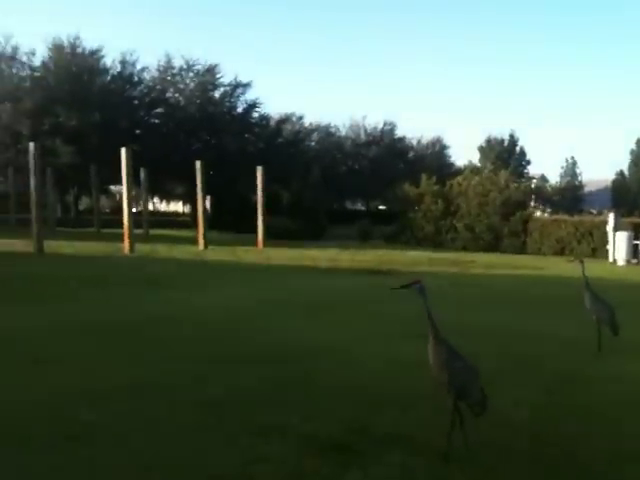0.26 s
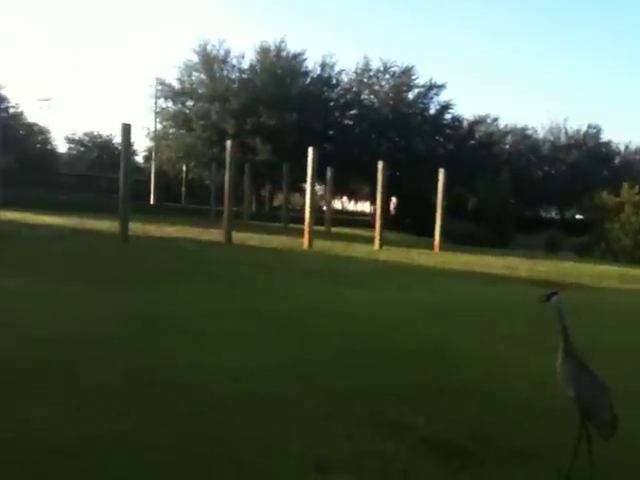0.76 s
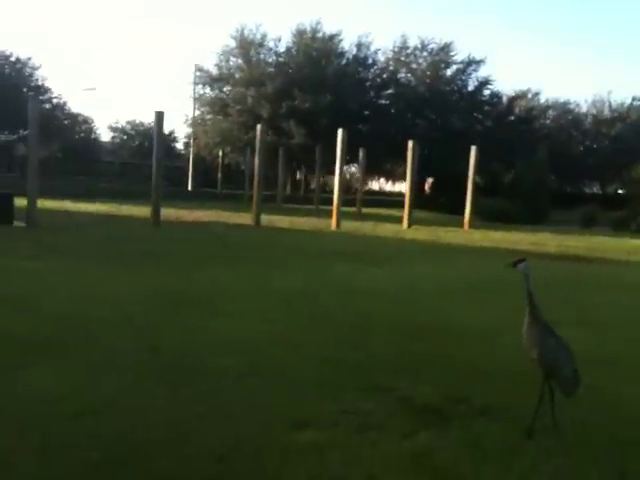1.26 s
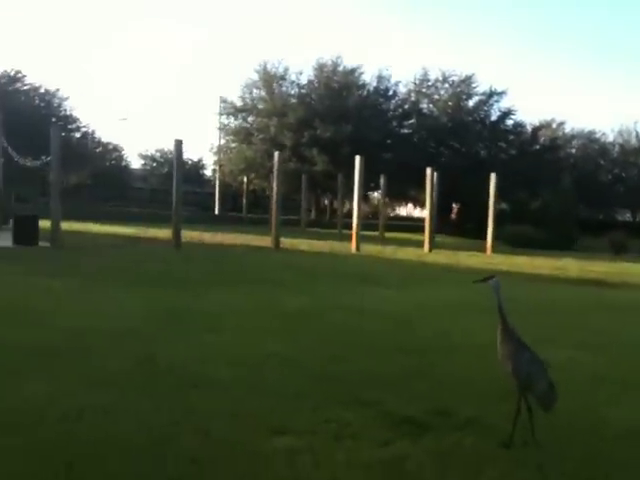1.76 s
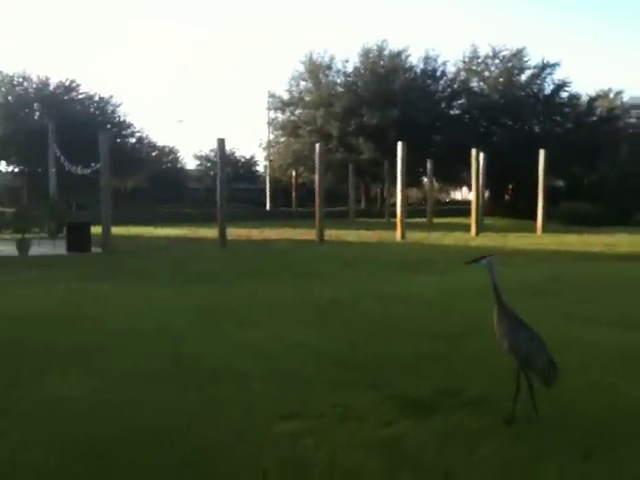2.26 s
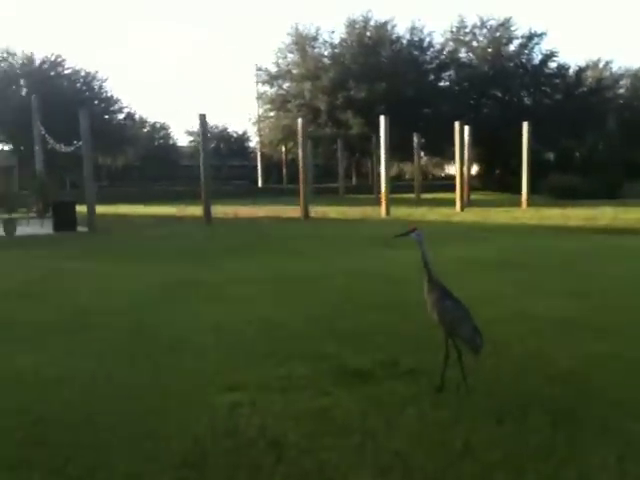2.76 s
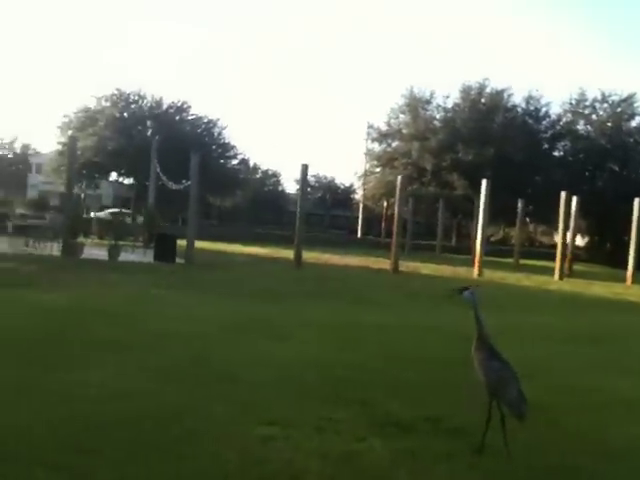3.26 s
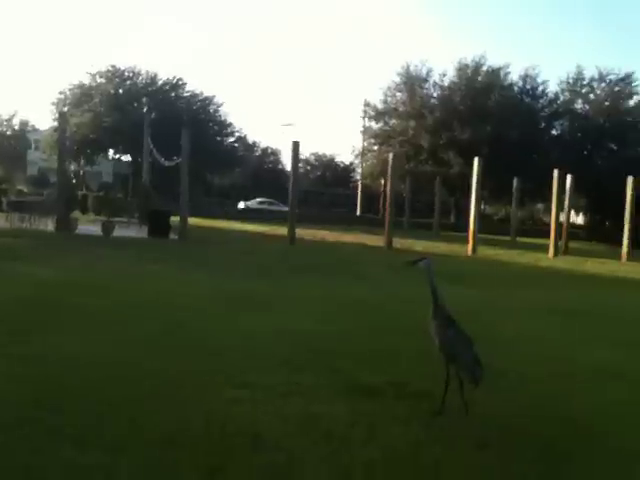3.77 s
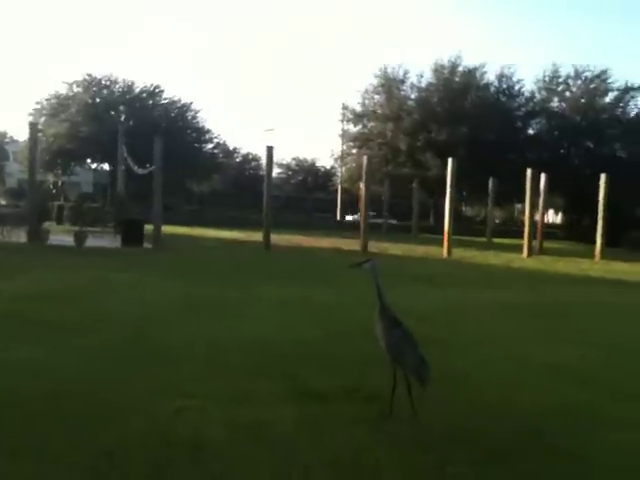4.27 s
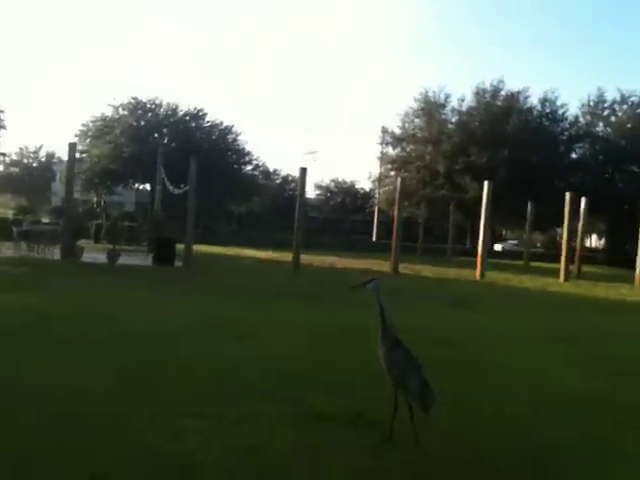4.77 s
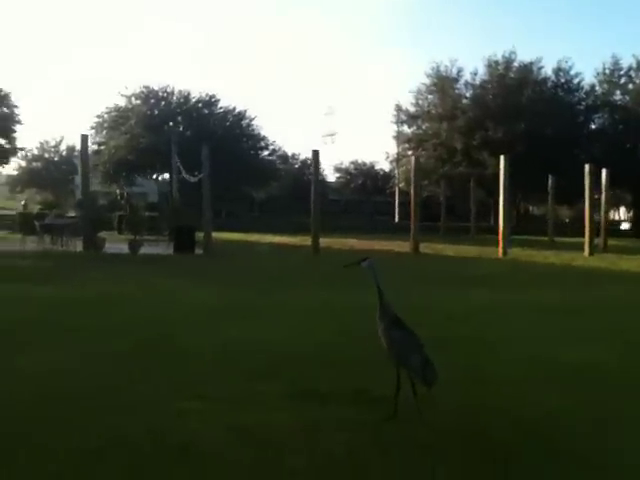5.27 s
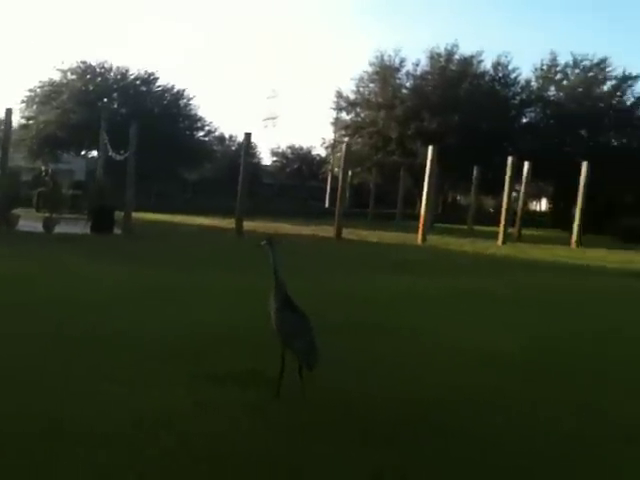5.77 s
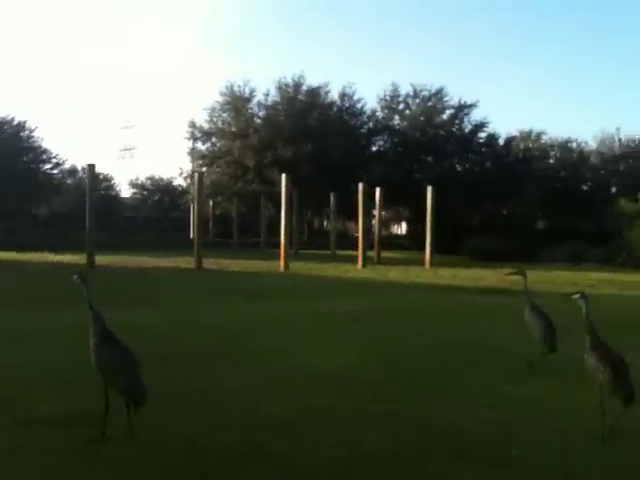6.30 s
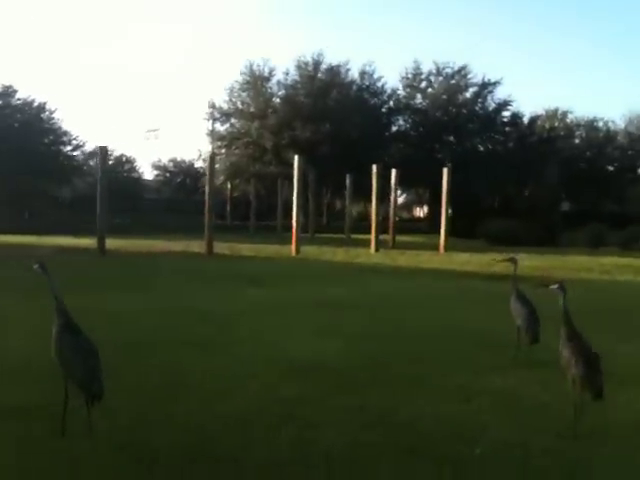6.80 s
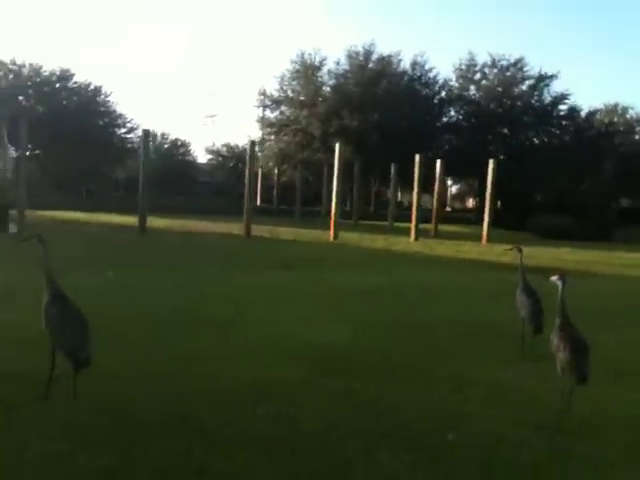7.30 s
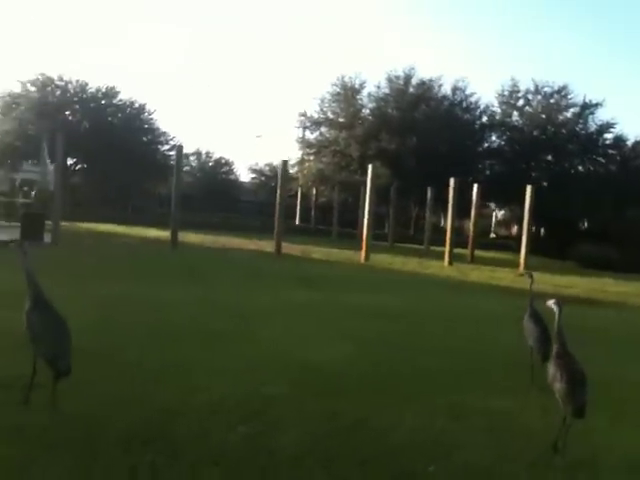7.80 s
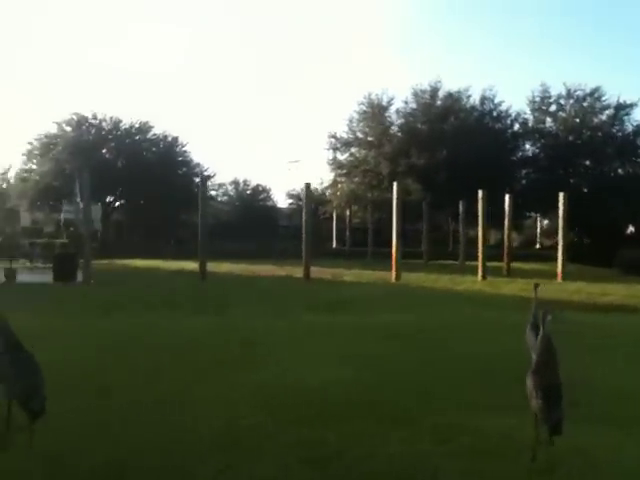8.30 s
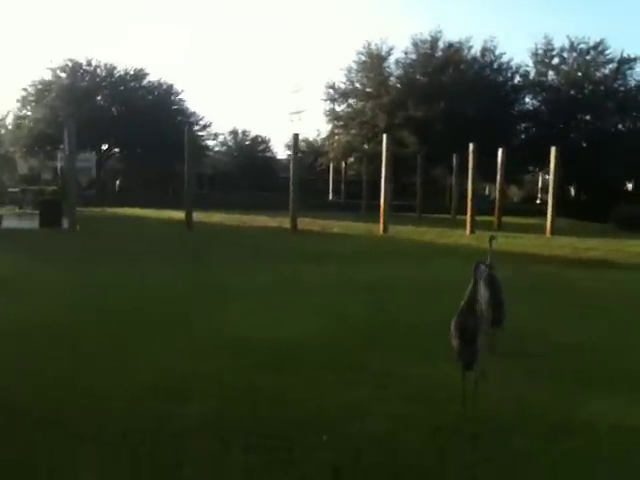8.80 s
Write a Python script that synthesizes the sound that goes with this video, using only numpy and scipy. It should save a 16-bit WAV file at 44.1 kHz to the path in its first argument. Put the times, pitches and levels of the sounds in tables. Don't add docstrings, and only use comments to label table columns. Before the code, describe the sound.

Outdoors on a residential lawn, two cranes call almost together, four times. The lower, stronger bird starts with a tiny rising hoot and a hard woody rattle; the higher, weaker bird joins a fifth of a second later. Each burst lasts about half a second, with faint echoes from houses and trees. Low town hum, far tyres and light hiss continue between calls, picked up by a phone microphone.

```python
import sys
import numpy as np
from scipy import signal
from scipy.fft import rfft, irfft
from scipy.io import wavfile
from scipy.ndimage import uniform_filter1d

SR = 44100
rng = np.random.default_rng(int(sys.argv[2]) if len(sys.argv) > 2 else 0)


def wav_record(signal):
    frames = np.transpose(np.atleast_2d(signal))
    bounded = np.clip(frames, -1, 1)
    quanta = np.round(bounded * 32767).astype(np.int16)
    wavfile.write(sys.argv[1], SR, quanta)


def undo_db(level):
    steps = np.asarray(level, float) / 20
    return 10 ** steps


N = 399105


def colour(points, hz):
    f, db = np.transpose(points)
    return np.interp(np.log(np.maximum(hz, 1)), np.log(f), db)


def band(x, lo_hz, hi_hz):
    sos = signal.butter(2, [lo_hz, min(hi_hz, .49 * SR)], "bandpass", fs=SR, output="sos")
    return signal.sosfilt(sos, x)


def unit(x):
    return x / np.sqrt(np.mean(x ** 2))


def bell(t, at, width):
    return np.exp(-.5 * ((t - at) / width) ** 2)


def noise_band(n, lo_hz, hi_hz):
    return unit(band(rng.standard_normal(n), lo_hz, hi_hz))


def walk(rate_hz):
    k = int(SR / rate_hz)
    held = np.repeat(rng.standard_normal(N // k + 1), k)
    return uniform_filter1d(uniform_filter1d(held, k), k)[:N]


def add(out, sound, start_s):
    i = int(start_s * SR)
    out[i:i + len(sound)] += sound[:N - i]


LOW_FACING = [3, 3, 0, 0.5]
LOW_NECK = [.99, 1.01, 1.01, 0.91]
LOW_DROP = [0.925, .92, .94, 0.95]
LOW_COUNT = [7, 7, 6, 6]
# round trip in ms, third pitch in Hz, last pitch in Hz, treble loss as a burst weakens,
# breath in dB, run-up in dB.
LOW_PIPE = (5, 806, 611, 0, -20, -25.5)
# frequency in Hz, level in dB.
LOW_BEAK = [(500, 8.5), (900, 2.5), (1300, 0), (1800, -17), (2700, -24.5), (3700, -19), (4700, -18.5),
            (6500, -26), (10000, -37), (16000, -41)]
# frequency in Hz, width in Hz, level in dB.
LOW_MODES = [(589.3, 32, 0), (861, 25, -5), (1746, 88, -1.5), (3260, 250, -0.5)]
# start in seconds, level in dB.
LOW_HOOTS = [
    (0.4992, -25.5),
    (3.138, -26),
    (5.475, -25.5),
    (7.444, -26),
]
# time from its start in ms, pitch in Hz, level in dB.
LOW_HOOT = [(-12, 570, -29), (-6.5, 480, -9), (3, 520, -2), (16.5, 552, 0), (34, 572, 0.5), (45, 570, -0.5),
            (51.5, 516, -9), (59.5, 400, -27)]
LOW_HOOT_TONES = [-1, -2, -14.5, -18.5, -21, -24, -22.5, -27.5, -25.5, -31, -28, -36]
# first clap in seconds, first gap in ms, settled gap in ms, closing gap in ms.
LOW_PACE = [(.6232, 67.2, 51.8, 54), (3.2614, 68.3, 50.7, 65), (5.6022, 69.0, 52.3, 62),
            (7.5672, 69.0, 51, 62)]
# level in dB, fade by its end in dB, opening pitch in Hz, final pitch in Hz,
# closing clap in dB.
LOW_EFFORT = [(-5.5, 6.5, 932, 818, -33), (-7, 11, 944, 850, -39), (-10.5, 8, 946, 810, -35.5),
              (-11.5, 6.5, 949, 807, -35)]
# share of the extra gap kept per clap, bend of the fade, bend of the pitch sag,
# first clap in dB, closing pitch in Hz.
LOW_STYLE = (0.7016, 3, 2, -0.1, 579)
LOW_TIRING = [(1.0, 1.24), (-4.5, -2.5), (-15.5, -5.5)]


def low_crane():
    calls = rattles(LOW_PACE, LOW_EFFORT, LOW_DROP, LOW_COUNT, LOW_STYLE, LOW_TIRING)
    return crane(calls, LOW_FACING, LOW_NECK, LOW_PIPE, LOW_BEAK, LOW_MODES,
                 LOW_HOOTS, LOW_HOOT, LOW_HOOT_TONES)


HIGH_FACING = [4, 4, 1, -2.5]
HIGH_NECK = [1.08, 0.82, 1.01, .8]
HIGH_DROP = [0.876, 0.905, 0.906, 0.95]
HIGH_COUNT = [9, 9, 8, 9]
# round trip in ms, third pitch in Hz, last pitch in Hz, treble loss as a burst weakens,
# breath in dB, run-up in dB.
HIGH_PIPE = (5.5, 902, 865, 0.13, -16, -49)
# frequency in Hz, level in dB.
HIGH_BEAK = [(500, 12.5), (1000, 2), (1400, -6.5), (1900, -6.5), (2300, -19), (3100, -14.5), (4300, -16.5),
             (6500, -24.5), (10000, -46), (16000, -56)]
# frequency in Hz, width in Hz, level in dB.
HIGH_MODES = [(679, 34, -2.5), (876, 33, -6.5), (1086, 148, -6), (1806, 71, -1.5), (1936, 47, 2)]
# start in seconds, level in dB.
HIGH_HOOTS = [
    (.72, -39),
    (3.392, -38.5),
    (5.948, -36.5),
    (7.83, -32),
]
# time from its start in ms, pitch in Hz, level in dB.
HIGH_HOOT = [(-10, 560, -28), (1, 530, -3), (10, 620, 2.5), (32.5, 623, -0.5), (31, 740, -13),
             (43, 770, -25.5)]
HIGH_HOOT_TONES = [0, 1, -3.5, -34, -9, -19, -18, -24, -27.5, -34, -38, -37]
# first clap in seconds, first gap in ms, settled gap in ms, closing gap in ms.
HIGH_PACE = [(.8298, 72.36, 52.4, 51.5), (3.5025, 72.23, 53.46, 54.6), (6.0612, 72.2, 52.52, 55),
             (7.9364, 70.2, 52.86, 55.2)]
# level in dB, fade by its end in dB, opening pitch in Hz, final pitch in Hz,
# closing clap in dB.
HIGH_EFFORT = [(-16.5, 4.1, 1110, 906, -38), (-14, 7.4, 1096, 906, -37.5), (-14.5, 7.4, 1043, 940, -38.5),
               (-11, 14.7, 1063, 900, -53)]
# share of the extra gap kept per clap, bend of the fade, bend of the pitch sag,
# first clap in dB, closing pitch in Hz.
HIGH_STYLE = (0.6845, 5, 3.5, -3.5, 627)
HIGH_TIRING = [(1.0, 1.09), (-3, -3.5), (-15.5, -6)]


def high_crane():
    calls = rattles(HIGH_PACE, HIGH_EFFORT, HIGH_DROP, HIGH_COUNT, HIGH_STYLE, HIGH_TIRING)
    return crane(calls, HIGH_FACING, HIGH_NECK, HIGH_PIPE, HIGH_BEAK, HIGH_MODES,
                 HIGH_HOOTS, HIGH_HOOT, HIGH_HOOT_TONES)


def crane(calls, facing, neck, pipe, beak, modes, hoots, shape, tones_db):
    out = np.zeros(N)
    octave = np.log2(np.arange(len(tones_db)) + 4.0)
    for rows, facing_db, stretch, (start_s, db) in zip(calls, facing, neck, hoots):
        opening = hoot(shape, tones_db + facing_db * 1.24 * octave)
        add(out, undo_db(db) * opening, start_s + shape[0][0] / 1000)
        for row in rows:
            add(out, clap(row, facing_db, stretch, pipe, beak), row[0] - 500 / SR)
    ring = 0
    for hz, width_hz, db in modes:
        ring = ring + undo_db(db) * signal.lfilter(*signal.iirpeak(hz, hz / width_hz, fs=SR), out)
    return undo_db(-3.5) * (out + ring)


def rattles(paces, efforts, drops, counts, style, tiring):
    return [rattle(p, e, d, style, tiring, n) for p, e, d, n in zip(paces, efforts, drops, counts)]


def rattle(pace, effort, drop, style, tiring, count):
    scatter_db, scatter_pitch = 1.5, .006
    start_s, first_ms, settled_ms, closing_ms = pace
    level_db, fade_db, open_hz, final_hz, closing_db = effort
    keep, fade_bend, sag_bend, first_db, closing_hz = style
    k = np.arange(count)
    gaps_ms = np.append(settled_ms + (first_ms - settled_ms) * keep ** k[:-1], closing_ms)
    s = start_s + np.append(0, np.cumsum(gaps_ms)) / 1000
    tired = k / k[-1]
    luck = rng.standard_normal((4, count))
    db = level_db - fade_db * tired ** fade_bend + first_db * (k == 0) + scatter_db / 2 * luck[0]
    hz = (open_hz + (final_hz - open_hz) * tired ** sag_bend) * (1 + scatter_pitch * luck[1])
    share, second_db, dying_db = (fresh + (worn - fresh) * tired ** 2 for fresh, worn in tiring)
    second_db = second_db + scatter_db * luck[2]
    dying_db = dying_db + scatter_db * luck[3]
    rows = np.transpose([s[:-1], db, hz, drop * share * hz, second_db, dying_db])
    return list(rows) + [(s[-1], closing_db, closing_hz, 0.91 * closing_hz, -3.0, -17.0)]


def clap(row, facing_db, stretch, pipe, beak):
    _, peak_db, first_hz, second_hz, second_db, dying_db = row
    trip_ms, third_hz, last_hz, loss, breath_db, runup_db = pipe
    crack_db = -27.5
    t = np.arange(-500, 1700) / SR
    luck = rng.standard_normal((3, 5))
    echo_ms = trip_ms * stretch * np.array([-1.2, 0, 1, 2, 3])
    centre_s = (echo_ms + .3 * luck[0] * [1, 0, 1, 1, 1]) / 1000
    last_db = dying_db - 5.0 - 1.34 * facing_db
    size_db = np.array([runup_db, 0, second_db - 2.0, dying_db + 1.5, last_db])
    size_db = size_db + 1.45 * luck[1] * [1, 0, 0, 1, 1]
    pitch_hz = np.array([first_hz, first_hz, second_hz, min(third_hz, second_hz), min(last_hz, second_hz)])
    pitch_hz = pitch_hz * (1 + 0.019 * luck[2] * [1, 0, 0, 1, 1])
    rise_ms, fall_ms = [1.5, 1.6, 1.5, 1.5, 1.5], [1.5, 2.1, 2.1, 1.8, 3.9]
    ragged = [.2, .25, .6, 1.1, 1.2]
    k = np.arange(1, 22)[:, None]
    voice, effort = 0, 0
    for at, db, hz, rise, fall, rag in zip(centre_s, size_db, pitch_hz, rise_ms, fall_ms, ragged):
        size = undo_db(db) * bell(1000 * (t - at), 0, np.where(t < at, rise, fall))
        wobble = uniform_filter1d(rng.standard_normal(len(t)), size=40)
        phase = 2 * np.pi * np.cumsum(hz * (1 - 3.5 * (t - at) + .16 * rag * wobble)) / SR
        phase = phase - np.interp(at, t, phase) + .4 * rag * rng.standard_normal()
        high = np.clip(np.log2(k * hz / 1200), 0, 2.9)
        lead = t - at + 0.29 * high / 1000
        front = undo_db(db) * bell(1000 * lead, 0, np.where(lead < 0, rise, fall))
        chance = rag * rng.standard_normal((2, len(k), 1)) * (k > 1)
        treble_db = (facing_db - 2.0 * rag) * high ** 1.436
        tones = undo_db(colour(beak, k * hz) + treble_db + 4.3 * chance[0]) * (k * hz < .4 * SR)
        waves = np.cos(k * phase + 0.4 * (k - 1) + chance[1])
        voice = voice - np.sum(tones * front ** (1 + loss * high) * waves, axis=0)
        effort = effort + size * (at >= 0)
    breath = noise_band(len(t), 686, 3230) * effort ** 0.58 * undo_db(breath_db + facing_db)
    early = np.roll(effort, shift=-25)
    crack = noise_band(len(t), 2000, 10500) * early ** 3.05 * undo_db(crack_db + 3.4 * facing_db)
    return undo_db(peak_db) * (voice + breath + crack)


def hoot(rows, tones_db):
    ms, hz, db = np.transpose(rows)
    t_ms = np.arange(ms[0], ms[-1], 1000 / SR)
    n = len(t_ms)
    wobble = uniform_filter1d(rng.standard_normal(n), size=150)
    glide_hz = uniform_filter1d(np.interp(t_ms, ms, hz), size=200)
    phase = 2 * np.pi * np.cumsum(glide_hz * (1 + .13 * wobble)) / SR
    tones_db = np.append(tones_db, tones_db[-1] - 1.55 * np.arange(1, 13))
    size = undo_db(np.interp(t_ms, ms, db) - np.max(db))
    flutter = uniform_filter1d(rng.standard_normal((len(tones_db), n)), size=300) * np.sqrt(300)
    wave = 0
    for k, tone_db in enumerate(tones_db):
        level = undo_db(tone_db + min(k, 4) * 1.43 * flutter[k]) * size ** (0.28 * k)
        wave = wave - level * np.cos((k + 1) * phase + 1.1 * k)
    wave = unit(wave) + undo_db(-43.5) * noise_band(n, 700, 7600)
    return wave * size * undo_db(np.max(db)) * signal.windows.tukey(n, .1)


# time in ms, pitch in Hz, level in dB.
COO = [(150, 400, -68), (248, 370, -56), (402, 450, -57), (490, 450, -69)]


def far_coo():
    out = np.zeros(N)
    coo = hoot(COO, [0, -60])
    add(out, coo * walk(66)[:len(coo)], COO[0][0] / 1000)
    return out


# delay in seconds, level in dB.
ECHOES = [
    (.035, -25),
    (.054, -30),
    (.09, -57),
    (.16, -46.5),
    (.21, -34),
]
# band in Hz, t60 in seconds, level in dB.
GARDEN = [(510, .8, -37), (1020, 1.08, -28.5), (1930, 1.8, -32.5), (4130, 1.15, -31.5), (8000, 1.6, -35.5)]


def garden(x):
    turn_db_per_s = 2.1
    t = np.arange(SR) / SR
    response = np.zeros(SR)
    for delay_s, db in ECHOES:
        smear = rng.standard_normal(900) * np.exp(-np.arange(900) / 200)
        add(response, undo_db(db) * smear / np.sqrt(np.sum(smear ** 2)), delay_s)
    for hz, t60_s, db in GARDEN:
        tail = band(rng.standard_normal(SR), hz / 1.63, hz * 1.68)
        tail = tail * undo_db(-60 * t / t60_s) * np.minimum(t / 0.081, 1)
        response += undo_db(db) * tail / np.sqrt(np.sum(tail ** 2)) * np.sqrt(hz / SR) * 4
    turned = undo_db(turn_db_per_s * (np.arange(N) - N / 2) / SR) - 1
    return x + signal.fftconvolve(x + turned * band(x, 2700, 20000), response)[:N]


# frequency in Hz, density in dB per Hz.
TOWN = [(15, -73), (30, -47), (74, -22.5), (167, -5), (226, -4.5), (266, -8), (330, -16.5), (470, -14.5),
        (538, -21), (927, -15.5), (1780, -21.5), (5270, -44), (9000, -50), (15600, -50)]
# time in seconds, width in seconds, level in dB over the tyres.
CAR = (2.65, 0.41, 3.4)
# time in seconds, width in seconds, level in dB over the hiss.
RUSTLES = [
    (.33, .05, 3),
    (2.22, .03, 2),
    (2.35, .035, 5),
    (2.87, .015, 4),
    (4.9, .07, 4),
    (7.0, .05, 4),
    (8.98, .04, 3),
]
# frequency in Hz, width in Hz, level in dB.
WHINE = (15050, 220, -86)


def town():
    t = np.arange(N) / SR
    hum_db = -49 - 0.3947 * t
    car_s, car_width_s, car_db = CAR
    tyre_db = -57.5 - 0.37 * t + car_db * bell(t, car_s, car_width_s)
    hiss_db = -74.5 + sum(db * bell(t, at, width_s) for at, width_s, db in RUSTLES)
    f = np.arange(N // 2 + 1) * SR / N
    shape = undo_db(colour(TOWN, f)) * (f < 15700)
    hum = np.clip((380 - f) / 120, 0, 1)
    hiss = np.clip((f - 2500) / 3000, 0, 1)
    layers = [(hum, 100, 310, hum_db), (1 - hum - hiss, 600, 2500, tyre_db), (hiss, 5000, 14000, hiss_db)]
    out = 0
    for share, lo_hz, hi_hz, db in layers:
        scale = np.sqrt(N / 2 / np.sum(shape[(f > lo_hz) & (f < hi_hz)] ** 2))
        noise = irfft(rfft(rng.standard_normal(N)) * shape * np.sqrt(share) * scale, N)
        out = out + noise * undo_db(db + 1.1 * walk(9))
    hz, width_hz, db = WHINE
    return out + undo_db(db) * noise_band(N, hz - width_hz / 2, hz + width_hz / 2)


def scene():
    birds = low_crane() + high_crane() + far_coo()
    return (garden(birds) + town())[None]


def low_pass(x):
    return signal.sosfilt(signal.butter(12, 16800, fs=SR, output="sos"), x)


def record(dry):
    dry = dry - 0.13 * dry ** 2
    dry = np.tanh(1.1 * dry) / 1.1
    dry = signal.sosfilt(signal.ellip(8, .2, 60, 16050, fs=SR, output="sos"), dry)
    return low_pass(dry)


dry = scene()
out = record(dry)
wav_record(out)
```